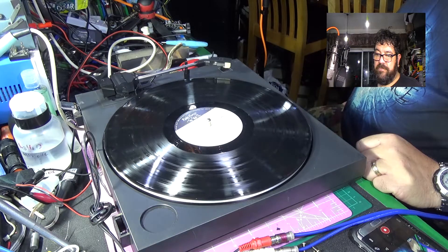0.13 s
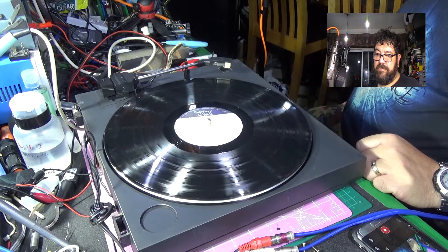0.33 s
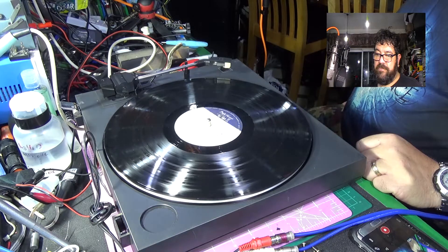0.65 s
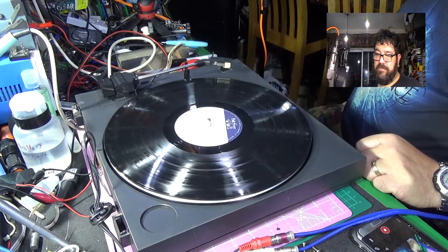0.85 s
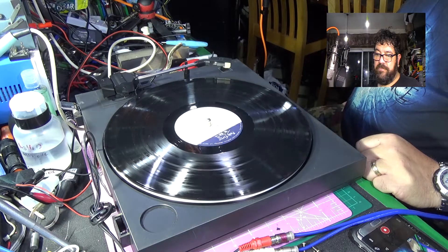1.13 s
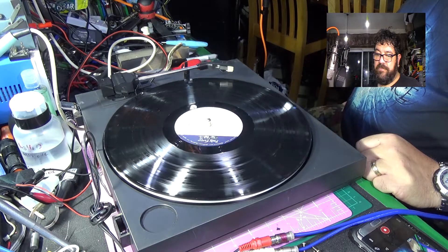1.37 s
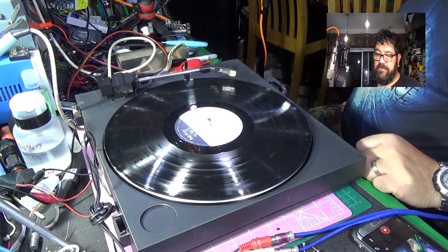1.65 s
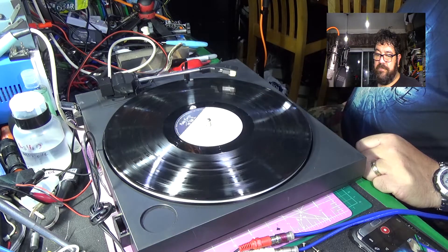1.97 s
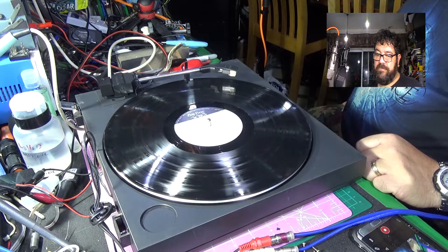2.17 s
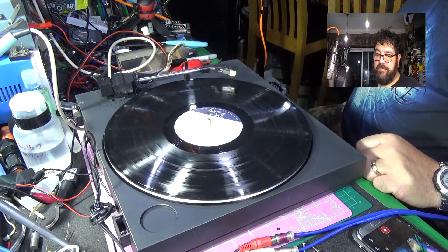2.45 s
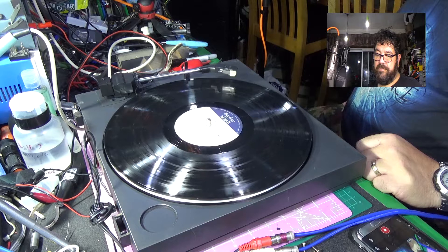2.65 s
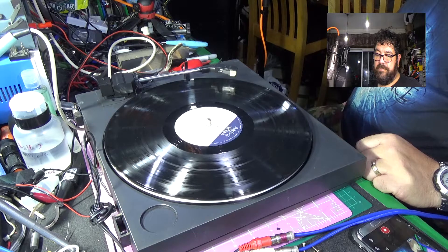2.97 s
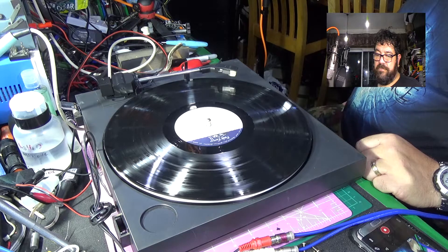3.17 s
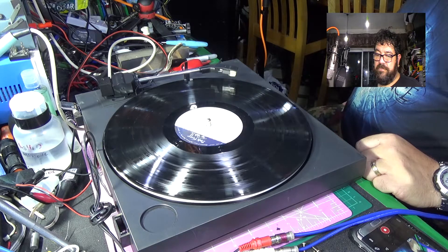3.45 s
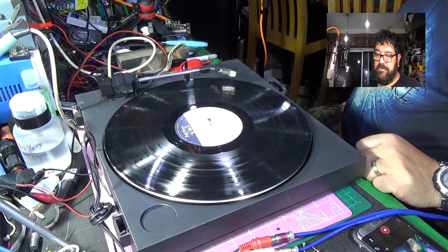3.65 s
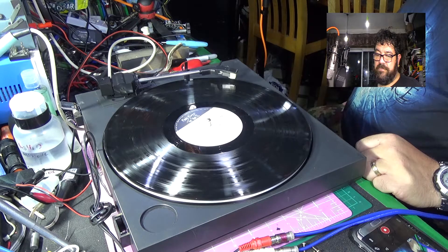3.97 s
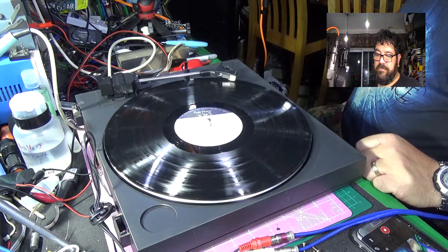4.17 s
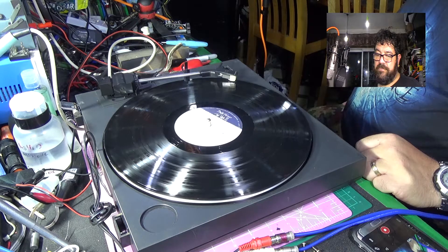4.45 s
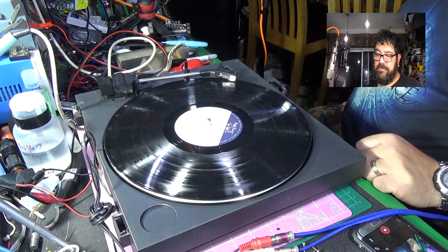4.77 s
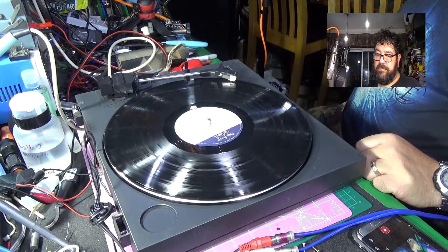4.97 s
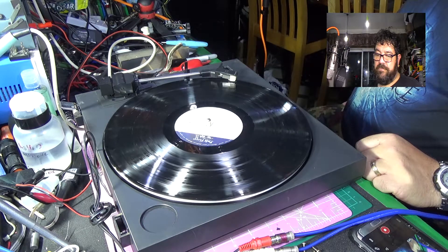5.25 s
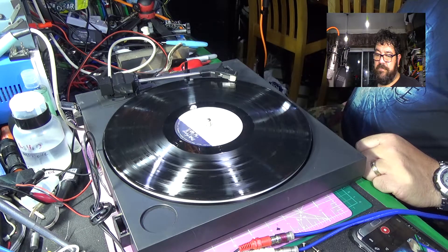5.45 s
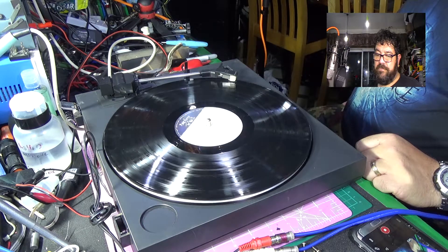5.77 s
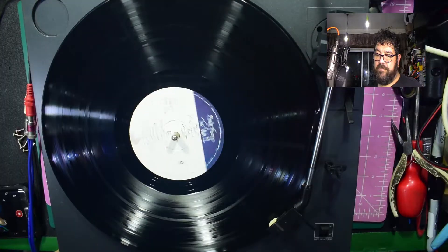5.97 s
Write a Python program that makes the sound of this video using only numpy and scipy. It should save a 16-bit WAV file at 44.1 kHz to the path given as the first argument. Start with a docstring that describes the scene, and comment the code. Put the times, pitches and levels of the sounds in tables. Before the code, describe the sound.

A record player runs through its automatic start on a workbench in a small room. Faint, irregular plastic clicks and taps come from the mechanism for the first few seconds. Near four seconds a sharper click leads into two louder, thumping clunks as the arm comes down, the second the strongest. A low hum, rumble and soft hiss continue throughout and are left on their own at the end.

```python
"""On a workbench in a small room, a record player runs its automatic start. The cam taps and rubs
plastic levers: impacts ring the plinth's damped modes, and sliding friction makes noise. As the arm
comes down, shoves rock the deck on its feet and two catches snap home, rebounding and twanging a
steel spring. Mains hum, rumble, a weak drone, steady hiss and a faint gliding whistle lie beneath."""
import sys
import numpy as np
from scipy import signal
from scipy.fft import rfft, irfft, next_fast_len
from scipy.io import wavfile
from scipy.ndimage import map_coordinates

SR = 44100
rng = np.random.default_rng(int(sys.argv[2]) if len(sys.argv) > 2 else 0)


def waveform_to_disk(signal):
    """Save audio, clipped to [-1, 1], as 16-bit WAV at the path in sys.argv[1]."""
    frames = np.transpose(np.atleast_2d(signal))
    scaled = np.clip(frames, -1, 1) * 32767
    samples = np.round(scaled).astype(np.int16)
    wavfile.write(sys.argv[1], SR, samples)


N = 269451

# Mains and motor lines: f/Hz, rms level/dB
HUM_LINES = [(49.9, -46), (100, -58.5), (120, -53), (149.9, -52), (175, -73)]
# Spectrum of the rumble: f/Hz, relative density/dB
RUMBLE_SPECTRUM = [(15, -25), (30, 0), (42, 5.5), (60, -1.5), (90, -3.5), (115, -10.5), (170, -13.5),
                   (250, -13), (340, -19), (450, -23), (650, -29), (1050, -23.5), (1500, -26), (2200, -48),
                   (5000, -51)]
# Moments of load that make the deck drone: t/s, hold/s, level/dB
DRONE_LOADS = [(0.87, 0.14, -63), (2.62, 0.03, -59), (2.82, 0.06, -51.5), (5.75, 0.08, -52),
               (5.98, 0.038, -56)]
# Spectrum of the hiss: f/Hz, relative density/dB
HISS_SPECTRUM = [(200, -20), (700, -4), (1400, -9), (2300, -8.5), (3600, -5), (4500, -2.5), (5400, -2),
                 (6100, 0.5), (6950, -1.5), (7800, -6), (8700, -5), (11500, -6.5), (13500, -9.5),
                 (15700, -15.5)]
# Reverberation time of the room: f/Hz, T60/s
ROOM_DECAY = [(100, 0.42), (500, 0.086), (1500, 0.11), (4000, 0.14), (12000, 0.17)]
# Light lever taps: t/s, knock level/dB, tick level/dB, knock centre f/Hz
LEVER_TAPS = [(0.066, -52, -46.5, 1190), (0.884, -50, -66, 790), (1.178, -40, -62, 640),
              (1.597, -31.5, -42, 920), (1.902, -46.5, -55, 600), (2.735, -31.5, -53, 706),
              (3.342, -62, -49, 2200), (3.828, -21, -40.5, 1200), (4.102, -46, -41, 1500),
              (4.178, -40, -48, 600), (4.213, -37, -43, 900), (4.397, -39.5, -41.5, 790),
              (4.532, -33, -49, 820), (4.5616, -14.5, -41.5, 810)]
# Modes of the plastic plinth: f/Hz, relative level/dB, T60/s
PLINTH_MODES = [(294, -7.5, 0.083), (425.5, -6.5, 0.071), (514, -3, 0.039), (748, -12.5, 0.04),
                (786, -2, 0.028), (878, -1, 0.028), (1144, -0.5, 0.029), (1254, -7, 0.029),
                (1440, -6, 0.024), (1679, -5, 0.024)]
# Spectrum of a tap's tick: f/Hz, relative density/dB
TICK_SPECTRUM = [(300, -7), (900, 1), (1700, 2), (2400, -2.5), (3300, -2), (4500, -7), (6000, -11),
                 (12000, -32)]
# Glides of the whistle: t/s, start f/Hz, end f/Hz, level/dB
WHISTLE_GLIDES = [(1.18, 2900, 2200, -66), (1.83, 2980, 2190, -67), (2.49, 3000, 2270, -63),
                  (3.857, 2160, 2690, -63), (5.31, 3750, 3320, -57.5)]
# Strokes of the cam along a lever: t/s, hold/s, relative level/dB
CAM_STROKES = [(2.35, 0.08, -60), (2.82, 0.28, -59), (4.25, 0.21, -57)]
# Spectrum of the cam's friction: f/Hz, relative density/dB
RUB_SPECTRUM = [(300, -25), (600, -7), (830, 7), (1100, -10), (1500, 2), (2200, -29), (5000, -38)]
# Shoves that shake the whole deck: t/s, level/dB, centre f/Hz
DECK_SHOVES = [(4.183, -11, 75), (4.290, -14, 97), (4.303, -23, 172), (4.546, -25, 150), (4.622, -13, 196)]
# Modes of the deck on its feet: f/Hz, relative level/dB, T60/s
DECK_MODES = [(48.7, -5, 0.39), (64.4, -2, 0.15), (84, -0.5, 0.097), (135, -5, 0.096), (165, -7, 0.071),
              (217.8, -11, 0.27), (282.7, -8.5, 0.16)]
# Hard catches: t/s, knock level/dB, crack level/dB, knock centre f/Hz, first gap/s, rebound loss/dB
HARD_CATCHES = [(4.2896, -21, -14.5, 1290, 0.0135, 11.5), (4.612, -8, -20, 850, 0.0065, 3)]
# Spectrum of a catch's crack: f/Hz, relative density/dB
CRACK_SPECTRUM = [(100, -1), (400, 3.5), (1400, 4), (1900, -3.5), (2400, -1), (3300, 1.5), (4000, -3.5),
                  (5200, -5), (7000, -7), (9000, -13), (12000, -17), (16000, -34)]
# Modes of the steel catch spring: f/Hz, relative level/dB, T60/s
SPRING_MODES = [(2390, 1, 0.06), (2523, -2, 0.085), (3700, -13, 0.055), (3940, 5, 0.06)]


def amp(db):
    """Amplitude ratio: a factor of ten for every 20 dB."""
    return 10 ** (np.asarray(db) / 20)


def unit(x):
    """Normalisation to rms 1."""
    return x / np.sqrt(np.mean(x ** 2) + 1e-20)


def along(points, hz):
    """Interpolation of (f/Hz, value) points on a logarithmic frequency axis."""
    f, v = np.transpose(points)
    return np.interp(np.log(hz + 1), np.log(f + 1), v)


def wobble(rate):
    """Random modulation: a smooth curve with `rate` knots a second."""
    return map_coordinates(rng.standard_normal(int(N * rate / SR) + 4), [np.arange(N) * rate / SR])


def noise(spectrum, size):
    """Spectral shaping of white noise, at rms 1."""
    hz = np.fft.rfftfreq(size, 1 / SR)
    return unit(irfft(rfft(rng.standard_normal(size)) * amp(along(spectrum, hz)), size))


def add(track, s, sound):
    """Superposition of a sound on a track at time s."""
    part = track[max(round(s * SR), 0):][:len(sound)]
    part += sound[:len(part)]


def swells(rows, attack, release):
    """Trapezoidal envelopes: each (t/s, hold/s, level/dB) row rises, holds and falls."""
    t = np.arange(N) / SR
    return sum(amp(db) * np.interp(t, [s - attack, s, s + hold, s + hold + release], [0, 1, 1, 0])
               for s, hold, db in rows)


def favour(modes, centre_hz, falloff_db):
    """Selective excitation: a contact drives most the modes that suit its duration."""
    return [(hz, db - falloff_db * np.log2(hz / centre_hz) ** 2, t60) for hz, db, t60 in modes]


def ring(modes, scatter_db, attack):
    """Free vibration: damped modes sum, their strengths scattered anew at each blow; peak 1."""
    t = np.arange(SR // 2) / SR
    tone = sum(amp(db + rng.normal(0, scatter_db) - 60 * t / t60) * np.sin(2 * np.pi * hz * t)
               for hz, db, t60 in modes)
    tone = tone * (1 - np.exp(-t / attack))
    return tone / np.abs(tone).max()


def burst(spectrum, t60):
    """Modal overlap: the dense upper modes of a contact merge into quickly decaying noise."""
    t = np.arange(SR // 2) / SR
    return noise(spectrum, len(t)) * amp(-60 * t / t60)


def room(x, wall_db, wall_s, wet_db):
    """Reverberation: direct sound, one reflection from a near wall and a short diffuse tail."""
    hz, t, bands = signal.stft(rng.standard_normal(SR // 4), SR, nperseg=256)
    decay = amp(-60 * t / along(ROOM_DECAY, hz)[:, None])
    tail = signal.istft(bands * decay, SR, nperseg=256)[1]
    response = amp(wet_db) * tail / np.linalg.norm(tail)
    response[0] += 1
    response[round(wall_s * SR)] += amp(wall_db)
    return signal.fftconvolve(x, response)[:len(x)]


def mains_hum():
    """Forced vibration: mains and motor give nearly steady spectral lines."""
    t = np.arange(N) / SR
    return sum(amp(db + 0.17 * wobble(2.8)) * unit(np.sin(2 * np.pi * (hz * t + rng.random())))
               for hz, db in HUM_LINES)


def low_rumble():
    """Random vibration: platter and room give low noise of wavering level."""
    return amp(-47.5 + 1.4 * wobble(7)) * noise(RUMBLE_SPECTRUM, N)


def deck_drone(hz=222, idle_db=-67):
    """Narrow-band vibration: the deck's tone wanders in phase and level, and swells under load."""
    t = np.arange(N) / SR
    load = amp(idle_db) + swells(DRONE_LOADS, attack=0.052, release=0.08)
    tone = np.sin(2 * np.pi * hz * t + 0.55 * wobble(14))
    return load * unit(tone * amp(2.5 * wobble(18)))


def hiss():
    """Interference: reflections ripple the spectrum of a steady hiss, as of a small fan."""
    return amp(-49) * unit(room(noise(HISS_SPECTRUM, N), wall_db=-18, wall_s=0.0079, wet_db=-2))


def lever_taps():
    """Impact excitation: each light tap rings the plinth with a knock and a bright tick."""
    out = np.zeros(N)
    for s, knock_db, tick_db, centre_hz in LEVER_TAPS:
        modes = favour(PLINTH_MODES, centre_hz, falloff_db=6)
        knock = amp(knock_db) * ring(modes, scatter_db=0.5, attack=0.0012)
        tick = amp(tick_db) * burst(TICK_SPECTRUM, t60=0.064)
        add(out, s, room(knock + tick, wall_db=-4.5, wall_s=0.0064, wet_db=-0.5))
    return out


def whistle(glide_s=0.24):
    """Resonance: a thin, unsteady tone glides and levels off; its level flickers, and interference with a near
    wall echo makes it swell and fade."""
    out = np.zeros(N)
    progress = np.linspace(0, 1, round(glide_s * SR))
    for s, start_hz, end_hz, db in WHISTLE_GLIDES:
        hz = end_hz + (start_hz - end_hz) * (1 - progress) ** 1.6
        hz *= 1 + 0.02 * wobble(399)[:len(hz)]
        tone = np.sin(2 * np.pi * np.cumsum(hz) / SR)
        add(out, s, amp(db) * np.sin(np.pi * progress) * tone)
    flicker = amp(2.8 * wobble(25))
    return room(out * flicker, wall_db=-2, wall_s=0.00218, wet_db=-3)


def cam_rub():
    """Sliding friction: each stroke of the cam along a lever makes a swell of rough noise."""
    strokes = swells(CAM_STROKES, attack=0.049, release=0.12)
    roughness = amp(-1 + 1.7 * wobble(35))
    return strokes * roughness * noise(RUB_SPECTRUM, N)


def deck_thumps():
    """Mass on springs: each shove rocks the deck on its feet in its low modes."""
    out = np.zeros(N)
    for s, db, push_hz in DECK_SHOVES:
        modes = favour(DECK_MODES, push_hz, falloff_db=7)
        add(out, s, amp(db) * ring(modes, scatter_db=3.5, attack=0.0022))
    return out


def chatter(contacts, crack_t60=0.021, rebound_stretch=2.04):
    """Inelastic rebound: a catch's first blow is followed by ever sparser, weaker contacts."""
    for s, knock_db, crack_db, centre_hz, gap_s, loss_db in HARD_CATCHES:
        for k in range(contacts):
            onset_s = s + gap_s * k ** 1.35
            knock_loss_db = k * loss_db + 2.5 * k * (k - 1)  # the knock weakens faster than the crack
            t60 = crack_t60 * (rebound_stretch if k else 1)
            yield onset_s, knock_db - knock_loss_db, crack_db - k * loss_db, t60, centre_hz


def catches():
    """Broadband excitation: each hard contact rings the plinth, cracks and twangs the spring."""
    out = np.zeros(N)
    for s, knock_db, crack_db, t60, centre_hz in chatter(contacts=4):
        modes = favour(PLINTH_MODES, centre_hz, falloff_db=2)
        knock = amp(knock_db) * ring(modes, scatter_db=4, attack=0.00046)
        crack = amp(crack_db) * burst(CRACK_SPECTRUM, t60)
        twang = amp(knock_db - 17.5) * ring(SPRING_MODES, scatter_db=2, attack=0.00064)
        add(out, s, room(knock + crack + twang, wall_db=-17.5, wall_s=0.0064, wet_db=-1))
    return out


def scene():
    """Superposition: the pressures of all sources add at one point."""
    background = mains_hum() + low_rumble() + deck_drone() + hiss()
    return (background + lever_taps() + whistle() + cam_rub() + deck_thumps() + catches())[None]


def record(dry):
    """Band limiting: the deepest bass rolls off and the highest treble is cut."""
    bass_hz, top_hz = 36, 15750
    thinned = signal.sosfilt(signal.butter(3, bass_hz, "highpass", fs=SR, output="sos"), dry)
    size = next_fast_len(N + SR // 2)
    passband = np.fft.rfftfreq(size, 1 / SR) < top_hz
    return irfft(rfft(thinned, size) * passband, size)[..., :N]


dry = scene()
out = record(dry)
waveform_to_disk(out)
```